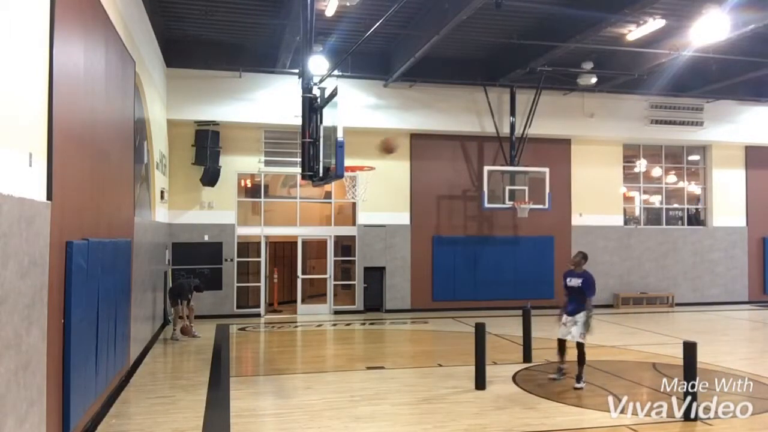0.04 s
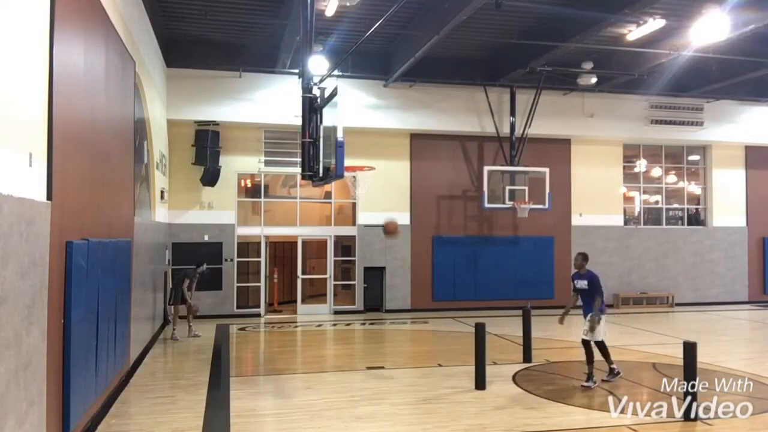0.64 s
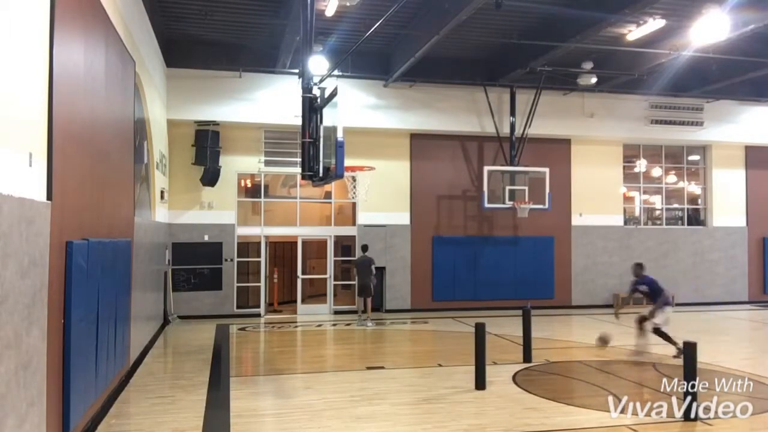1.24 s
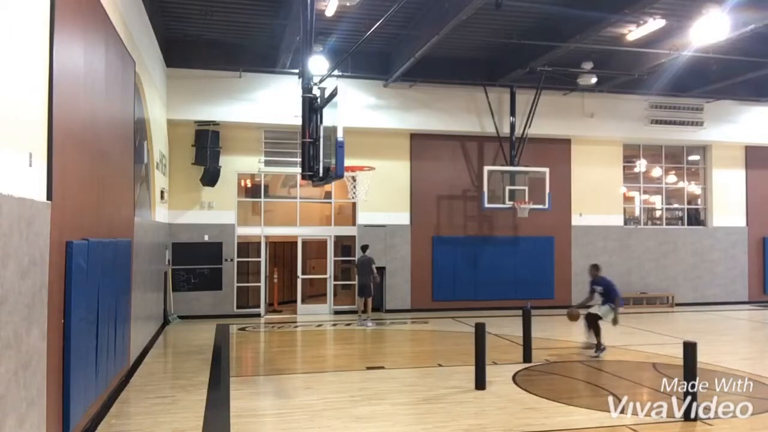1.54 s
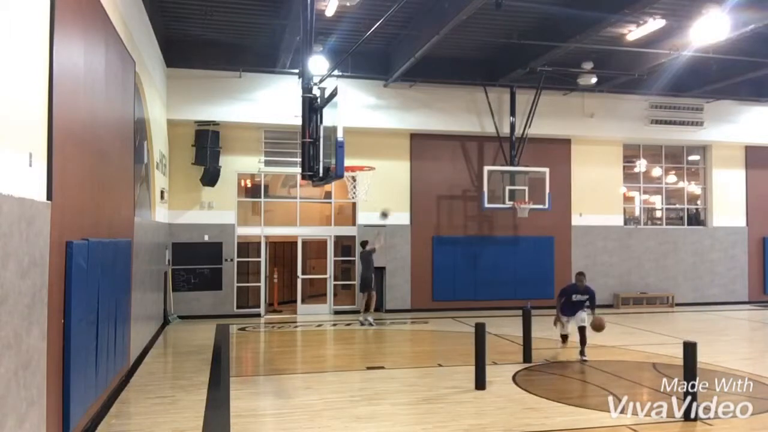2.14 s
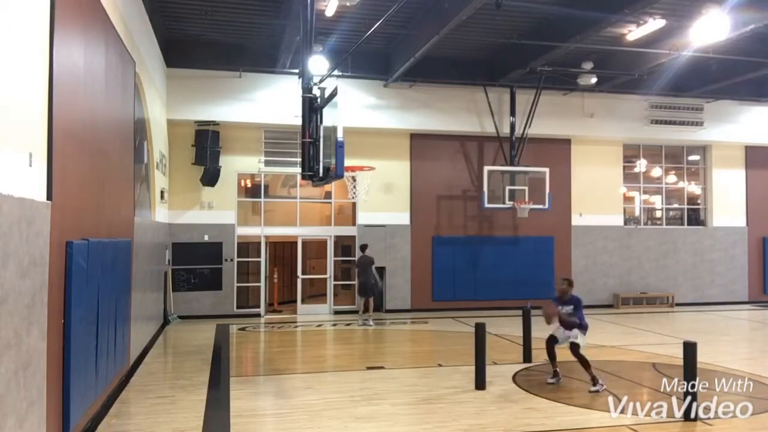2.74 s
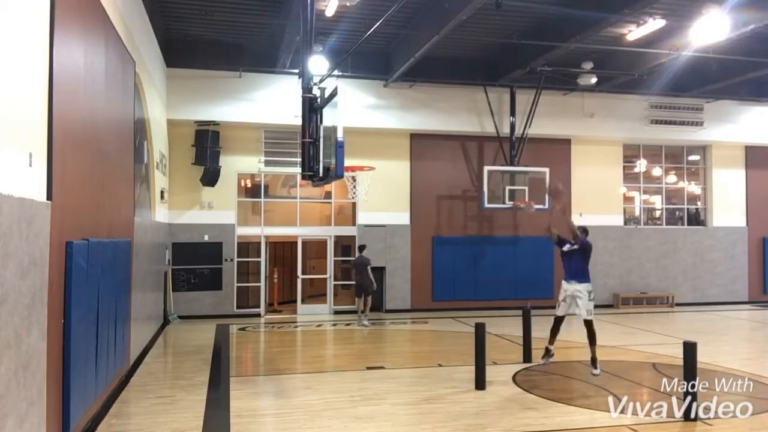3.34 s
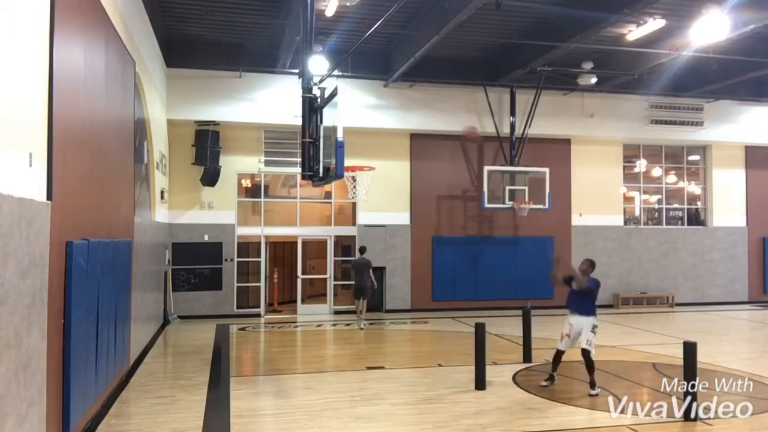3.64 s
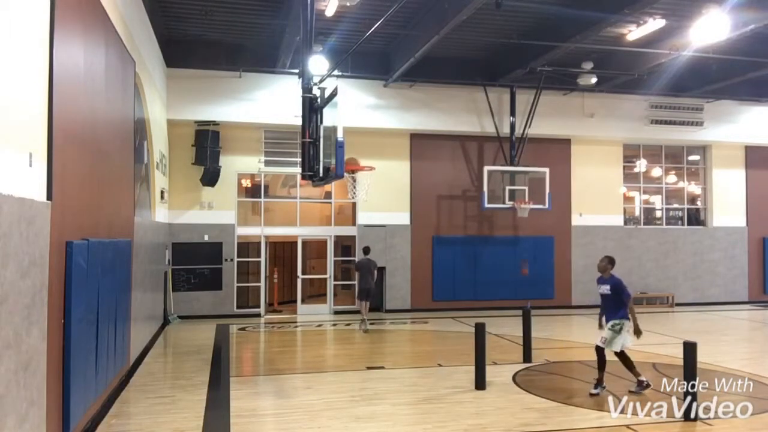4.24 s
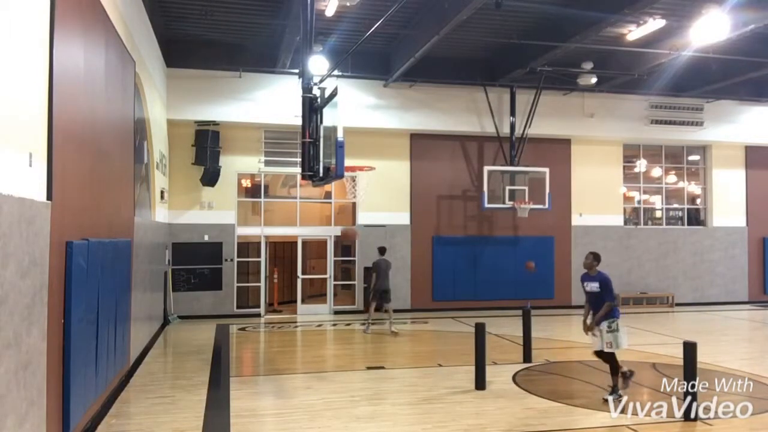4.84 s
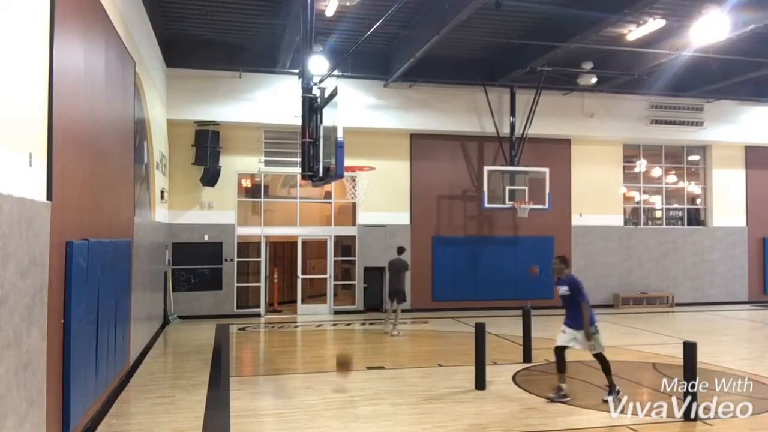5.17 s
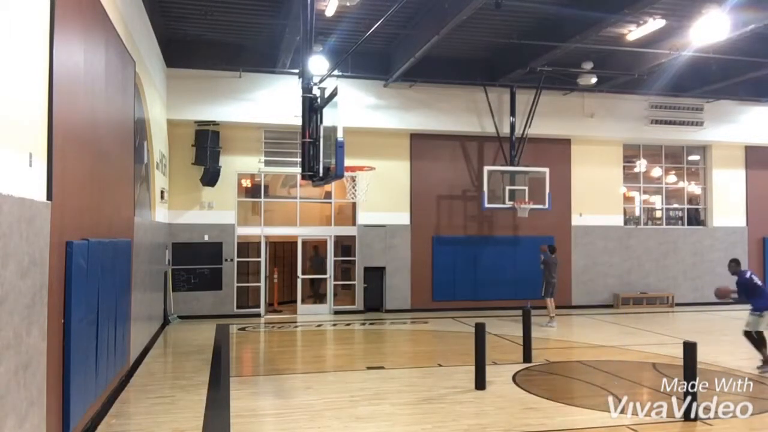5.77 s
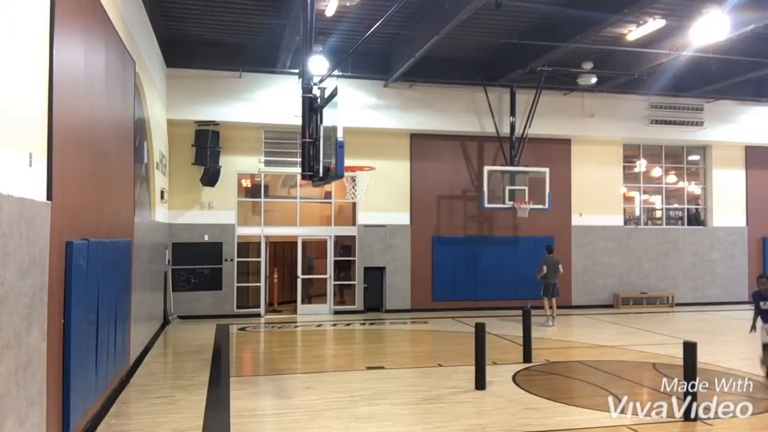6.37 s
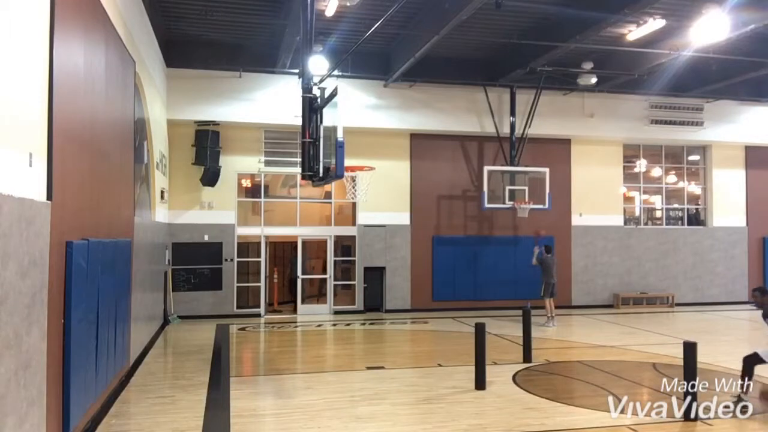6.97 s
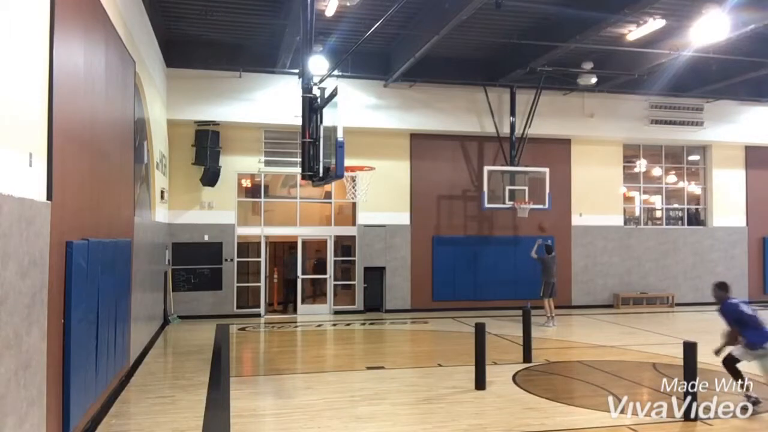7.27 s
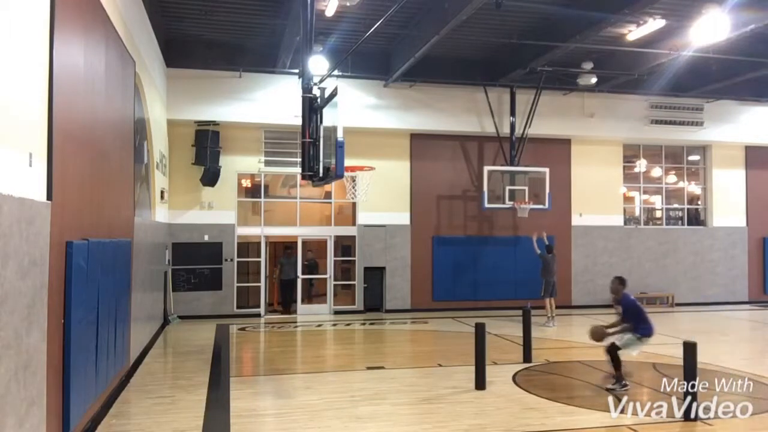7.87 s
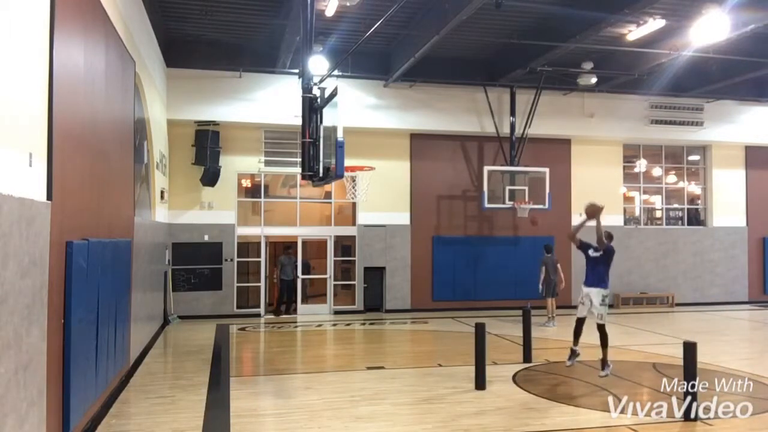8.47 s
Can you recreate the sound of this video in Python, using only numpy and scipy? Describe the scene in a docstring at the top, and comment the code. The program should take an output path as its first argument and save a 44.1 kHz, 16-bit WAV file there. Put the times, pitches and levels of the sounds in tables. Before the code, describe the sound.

Heard from the side of an indoor court, a ball knocks a distant hoop, then spaced basketball bounces mix with footfalls, brief rubber squeaks and a couple of catches. A second shot rattles the rim and net, and the ball hits the boards twice. A short run of hard dribbles and a squeaking stop follow. The big hall rings on after each sound, with air handlers rushing low underneath.

```python
"""A large gym with a sprung wooden floor: basketball practice, heard from the side of the court.
Each bounce slaps, pings the air in the ball and sets the boards booming. Shoes thump, rubber soles
squeak in short slips, hands catch the ball. Two shots rattle a far rim and brush the net.
Everything rings on in the hall, over the ventilation."""
import sys
import numpy as np
from scipy import signal
from scipy.fft import rfft, irfft, next_fast_len
from scipy.io import wavfile

SR = 44100
rng = np.random.default_rng(int(sys.argv[2]) if len(sys.argv) > 2 else 0)


def to_wav(s):
    """Save 16-bit WAV."""
    ch = np.atleast_2d(s).T  # columns
    pcm = np.round(np.clip(ch, -1, 1) * 32767)  # PCM
    wavfile.write(sys.argv[1], SR, pcm.astype(np.int16))


N = 375278
T = np.arange(int(.45 * SR)) / SR  # one event's time axis, s
LEAD_S = .5  # run-in ahead of the scene

# Spectra of air handlers, net cords, sole scrape, contact slap and board knock.
# Each row: frequency in Hz, relative level in dB.
VENT_SPECTRUM = [(20, -23), (40, -10), (60, -2), (110, -5.5), (200, -10.5), (450, -17.5), (1000, -21.5),
                 (3000, -40.5), (6000, -48.5), (10000, -62.5)]
NET_SPECTRUM = [(300, -4), (1500, -3), (4000, 3.5), (6800, -2.5), (10000, -20)]
SCRAPE_SPECTRUM = [(500, -20.5), (1200, -7), (2000, -6.5), (3000, 4.5), (6000, -0.5), (8000, -7),
                   (10000, -19)]
SLAP_SPECTRUM = [(200, -18.5), (550, -11.5), (850, -6), (1500, -0.5), (2400, -3.5), (3300, -7), (5000, -13),
                 (7000, -20), (10000, -33)]
KNOCK_SPECTRUM = [(60, -13.5), (150, -4.5), (260, 1.5), (400, -10), (700, -15), (1200, -15.5), (4000, -78)]
# Modes of the sprung floor, the air in the ball, and the steel rim on its mount.
# Each row: frequency in Hz, relative level in dB, T60 in seconds.
BOARD_MODES = [(54.7, -18, 0.3), (72.6, -4.5, 0.43), (92.7, 5.5, 0.28), (114, 0, 0.33), (164.7, -1.5, 0.21),
               (221.7, -6, 0.19), (279.4, -16, 0.24)]
BALL_AIR_MODES = [(910, -19, 0.41), (1200, -4.5, 0.95), (1289, 8.5, 0.083), (1491, 10, 0.097),
                  (1740, 3.5, 0.25), (2040, -9.5, 0.081), (2110, -12, 0.06), (2450, 1, 0.15)]
STEEL_RIM_MODES = [(430, -3.5, 0.01), (677, -5, 0.016), (1136, -0.5, 0.037), (1283, 5, 0.012),
                   (1545, 3.5, 0.005), (1830, 2, 0.0055), (2670, -1, 0.0036), (3980, -4.5, 0.0074),
                   (7860, -17.5, 0.017)]
# Hall reverberation. Each row: frequency in Hz, T60 in seconds.
HALL_DECAY = [(60, 2.5), (150, 2.4), (400, 3.4), (1000, 4.3), (1800, 3.9), (3000, 3.45), (5000, 2.37),
              (7500, 1.24), (10000, 0.88)]
# Reflections off the floor and things close by, and off the walls.
# Each row: delay in seconds, gain in dB.
NEAR_ECHOES = [(.0026, -10.5), (.0063, -10)]
WALL_ECHOES = [(.017, -9.5), (.056, -10), (.118, -12), (.155, -16)]
# Shots at the far hoop. Each row: start in seconds, thud in dB, rattle length in seconds, rim in dB,
# net delay in seconds, net in dB.
HOOP_SHOTS = [(.272, -36, 0.087, -38.5, 0.034, -52), (4.176, -33, 0.38, -32.5, 0.1, -41.5)]
# Shoes landing. Each row: start in seconds, boom in dB, sole slap in dB, hall send in dB.
FOOTSTEPS = [(-.25, -35, -39, 5), (0.834, -36.5, -42, 12), (1.774, -19, -48, 0), (2.669, -26.5, -49, 0),
             (2.731, -32, -44, -4.5), (3.37, -31, -51.5, 2.5), (3.43, -41.5, -41, 6),
             (3.632, -31.5, -45, 3.5), (3.935, -30, -52.5, -3), (4.989, -35.5, -54, -15),
             (8.398, -38.5, -48, 8)]
# Light sole squeaks; the one at 6.745 s is probably the previous squeak echoing off a wall.
# Each row: start in seconds, length in seconds, pitch in Hz, nominal level in dB,
# roughness from 0 to 1, hall send in dB.
LIGHT_SQUEAKS = [(0.834, 0.07, 4890, -38.5, 0.01, 1.5), (5.546, 0.019, 5340, -50, 0.08, -4),
                 (5.585, 0.012, 5250, -54, 0, -6), (5.885, 0.043, 4760, -46, 0.11, 9),
                 (5.915, .021, 5190, -45, .12, 5.5), (6.658, 0.0065, 4940, -27, 0.42, -1.5),
                 (6.745, .026, 5070, -40.5, 0.1, 7.5), (7.037, 0.043, 4690, -32, 0.27, 9),
                 (7.358, .012, 4670, -39, 0.37, 1)]
# Hard stops. Each row: start in seconds, chirp length in seconds, chirp in Hz, low note in Hz,
# high note in Hz, fractional pitch fall (negative rises), nominal level in dB,
# low note over high in dB, roughness from 0 to 1, hall send in dB.
HARD_STOPS = [(1.742, .015, 4600, 3256, 4633, .02, -23.5, -11.5, 0.26, 0),
              (2.776, 0.0097, 4910, 2860, 5750, -0.19, -25, 2, 0.6, 1.5),
              (8.042, 0.0055, 4570, 3044, 5245, .03, -26.5, 2.5, 0.15, 7)]
# Hands meeting the ball. Each row: start in seconds, slap in dB.
BALL_CATCHES = [(1.829, -35.5), (2.763, -43.5)]
# Ball on the floor. Each row: start in seconds, force in dB, board rattle over click in dB,
# slap tilt in dB per octave, ping over slap in dB.
BALL_BOUNCES = [(1.389, -4.5, 4, 1, -7), (2.4029, -4.5, 2, 0, -18), (4.5545, -2, -4, 2, -7),
                (5.3229, 0, -2, -2, -7), (6.5773, 3, -6, 0.5, -4), (7.111, 2, -10, 0.5, -11),
                (7.607, 2.5, 7, -.5, 0)]
# Overall gain, end values held. Each row: time in seconds, gain in dB.
GAIN_CURVE = [(5.302, 5), (5.325, 6.5), (5.465, 4), (5.474, 0.5)]


def undb(db):
    return 10 ** (np.asarray(db) / 20)


def burst(x, db):
    """Scale a short sound to the energy of 50 ms at this level."""
    return x * undb(db) / np.sqrt(np.sum(x ** 2) / (SR / 20))


def along(points, hz):
    """Read (Hz, value) points on a log-frequency axis."""
    point_hz, value = np.transpose(points)
    return np.interp(np.log(np.maximum(hz, 1)), np.log(point_hz), value)


def colour(x, spectrum, tilt_db_oct=0):
    """Minimum-phase filter with this spectrum, tilted about 2 kHz."""
    size = next_fast_len(len(x), real=True)
    hz = np.maximum(np.fft.rfftfreq(size, 1 / SR), 1)
    gain_db = along(spectrum, hz) + tilt_db_oct * np.log2(hz / 2000)
    cepstrum = irfft(np.log(undb(gain_db)), size)
    cepstrum[1:size // 2] *= 2
    cepstrum[size // 2 + 1:] = 0
    return irfft(rfft(x, size) * np.exp(rfft(cepstrum)), size)[:len(x)]


def fade(t, t60_s):
    return np.exp(-np.log(1000) * t / t60_s)


def ring(modes, detune):
    """Struck modes; each blow lands elsewhere and detunes them a little."""
    sound = np.zeros(len(T))
    for hz, db, t60_s in modes:
        struck_hz = hz * (1 + detune * rng.standard_normal())
        sound += undb(db) * fade(T, t60_s) * np.sin(2 * np.pi * (struck_hz * T + rng.random()))
    return sound


def noise():
    return rng.standard_normal(len(T))


def click():
    return burst(1. * (T == 0), 0)


def waver(rate_hz):
    """Random values at this rate, joined by lines."""
    return np.interp(T * rate_hz, np.arange(len(T)), noise())


def swell(length_s):
    """Rounded envelope of a short rub."""
    return np.sqrt(np.maximum(np.sin(np.pi * np.minimum(T / length_s, 1)), 0))


def later(sound, delay_s):
    return np.pad(sound, (max(int(delay_s * SR), 0), 0))[:len(T)]


def add(track, start_s, sound):
    """Mix into a track that starts LEAD_S before the scene."""
    start = int((start_s + LEAD_S) * SR)
    track[start:start + len(sound)] += sound[:max(len(track) - start, 0)]


def ventilation(level_db=-39.5):
    """Low, steady rush of the air handlers."""
    air = colour(rng.standard_normal(N), VENT_SPECTRUM)
    return air * undb(level_db) / np.std(air)


def hall(x, frame_samples=1024, tail_hops=380, build_s=0.0038, early_db=4, early_s=0.013):
    """Diffuse field: each band stores the energy fed in and loses it at its own rate, phase random."""
    hop = frame_samples // 4
    frames = dict(nperseg=frame_samples, noverlap=frame_samples - hop)
    hz, _, fed = signal.stft(x, SR, **frames)
    t = np.maximum(np.arange(tail_hops) - 2, 0) * hop / SR  # half a frame behind the direct sound
    onset = (1 - np.exp(-t / build_s)) * undb(early_db * np.exp(-t / early_s))
    decay = (fade(t, along(HALL_DECAY, hz[:, None])) * onset) ** 2
    decay /= decay.sum(axis=1, keepdims=True)
    stored = signal.fftconvolve(np.abs(fed) ** 2, decay, axes=1)[:, :fed.shape[1]]
    field = signal.stft(rng.standard_normal(len(x)), SR, **frames)[2]
    return signal.istft(field / np.std(field) * np.sqrt(np.abs(stored)), SR, **frames)[1][:len(x)]


def gym(events, smear_t60_s=0.032):
    """Each event arrives directly, off floor and walls, and through the hall."""
    lead = int(LEAD_S * SR)
    near, hall_feed = np.zeros((2, lead + N))
    for start_s, sound, send_db in events:
        add(near, start_s, sound)
        for delay_s, db in NEAR_ECHOES:
            add(near, start_s + delay_s * (1 + .2 * rng.uniform(-1, 1)), undb(db) * sound)
        # pads, frames and fittings smear the wall echoes
        smear = noise() * fade(T, smear_t60_s)
        scattered = signal.fftconvolve(sound, smear / np.linalg.norm(smear))[:len(T)]
        for delay_s, db in WALL_ECHOES:
            add(near, start_s + delay_s * (1 + .08 * rng.uniform(-1, 1)), undb(db) * scattered)
        add(hall_feed, start_s, undb(send_db) * sound)
    return (near + hall(hall_feed))[lead:]


def slap(db, rattle_db, tilt_db_oct=0, rattle_t60_s=0.058):
    """A sharp contact and the short chatter after it."""
    rattle = burst(noise() * fade(T, rattle_t60_s), rattle_db)
    return burst(colour(click() + rattle, SLAP_SPECTRUM, tilt_db_oct), db)


def thud(knock_db, boom_db, knock_t60_s=0.22, spread_s=0.0052):
    """A knock on the boards, and a boom that grows while the bending wave spreads."""
    rattle = burst(noise() * fade(T, knock_t60_s), 6.4)
    knock = colour(rattle - click(), KNOCK_SPECTRUM)
    boom = ring(BOARD_MODES, detune=0.022) * (1 - np.exp(-T / spread_s))
    return burst(knock, knock_db) + burst(boom, boom_db)


def ping(db):
    """The air in the ball rings."""
    return burst(ring(BALL_AIR_MODES, detune=0.0096), db)


def hoop(thud_db, rattle_s, rim_db, net_delay_s, net_db, chatter_db=6, chatter_hz=80, passage_s=0.043):
    """The ball thuds on the hoop; the rim chatters on its mount, the net cords rub over the ball."""
    hit = slap(thud_db - 23.5, rattle_db=21, rattle_t60_s=.12)
    hit += thud(knock_db=thud_db - 3, boom_db=thud_db)
    rub = noise() * undb(chatter_db * waver(chatter_hz))
    rim = signal.fftconvolve(rub * swell(rattle_s), ring(STEEL_RIM_MODES, detune=0.022))[:len(T)]
    net = colour(rub * swell(passage_s), NET_SPECTRUM)
    return hit + burst(rim, rim_db) + later(burst(net, net_db), net_delay_s)


def step(boom_db, slap_db):
    """A sole scuffs down and the player's weight thumps the floor."""
    scuff = slap(slap_db, rattle_db=11.5, tilt_db_oct=-0.5, rattle_t60_s=.12)
    return scuff + thud(knock_db=(boom_db + slap_db) / 2 - 6, boom_db=boom_db)


def squeak(length_s, pitch_hz, db, rough, sag=0.027, second_db=-15, third_db=-19, hard_rough=0.14):
    """Rubber sticks and slips thousands of times a second; pitch glides, rough slips waver and scrape."""
    glide = 1 + sag * (.5 - np.minimum(T / length_s, 1))
    wobble = 1 + 0.154 * rough * waver(rate_hz=597.6)
    phase = 2 * np.pi * np.cumsum(pitch_hz * glide * wobble) / SR
    overtones = undb(second_db) * np.sin(2 * phase) + undb(third_db) * np.sin(3 * phase)
    tone = np.sin(phase) + min(rough / hard_rough, 1) * overtones  # a smooth squeak is nearly a sine
    grip = swell(length_s) * undb(10 * rough * waver(rate_hz=435))
    scrape = colour(noise(), SCRAPE_SPECTRUM)
    return burst(tone * grip, db - 2.5) + rough * burst(scrape * grip, db - 3)


def skid(chirp_s, chirp_hz, low_hz, high_hz, sag, db, low_rel_db, rough, bite_s=0.027, lag_s=0.0027):
    """The sole's edge chirps; then the tread bites, shrieks on two notes and drags over the varnish."""
    chirp = squeak(chirp_s, chirp_hz, db - 5.5, rough=0.21, sag=.13)
    low = squeak(bite_s, low_hz, db + low_rel_db, rough, sag)
    high = squeak(bite_s, high_hz, db, rough, sag)
    drag = burst(colour(noise(), SCRAPE_SPECTRUM) * swell(bite_s), db - 7)
    bite = low + later(high, lag_s) + drag
    return chirp + later(bite, chirp_s)


def catch(slap_db):
    """A palm slaps the ball, which pings."""
    return slap(slap_db, rattle_db=3.5) + ping(slap_db - 3.5)


def bounce(force_db, rattle_db, tilt_db_oct, ping_rel_db, boom_db_per_db=0.89):
    """The ball slaps the boards, pings and sets the floor booming, all by the force of the throw."""
    slap_db = force_db - 31
    floor = thud(knock_db=force_db - 28.5, boom_db=boom_db_per_db * force_db - 20.5)
    return slap(slap_db, rattle_db, tilt_db_oct) + ping(slap_db + ping_rel_db) + floor


def scene(bounce_send_db=2.5, catch_send_db=6, hoop_send_db=5.5):
    """The practice sounds in the gym, over the ventilation; mono."""
    events = [(start_s, bounce(*row), bounce_send_db) for start_s, *row in BALL_BOUNCES]
    events += [(start_s, step(*row), send_db) for start_s, *row, send_db in FOOTSTEPS]
    events += [(start_s, catch(db), catch_send_db) for start_s, db in BALL_CATCHES]
    events += [(start_s, squeak(*row), send_db) for start_s, *row, send_db in LIGHT_SQUEAKS]
    events += [(start_s, skid(*row), send_db) for start_s, *row, send_db in HARD_STOPS]
    events += [(start_s, hoop(*row), hoop_send_db) for start_s, *row in HOOP_SHOTS]
    return (gym(events) + ventilation())[None]


def record(dry, low_hz=47.3, top_hz=9800):
    """Level surges on one bounce, then stays lower; peaks round off; a small microphone cuts the band."""
    times_s, gain_db = np.transpose(GAIN_CURVE)
    gain = undb(np.interp(np.arange(N) / SR, times_s, gain_db))
    rounded = np.tanh(dry * gain)
    highpass = signal.butter(4, low_hz, "high", fs=SR, output="sos")
    lowpass = signal.ellip(8, .3, 80, top_hz, fs=SR, output="sos")
    return signal.sosfilt(lowpass, signal.sosfilt(highpass, rounded))


dry = scene()
out = record(dry)
to_wav(out)
```